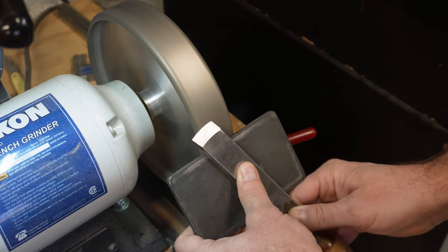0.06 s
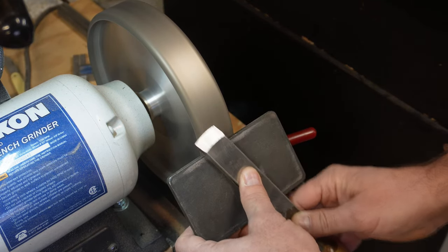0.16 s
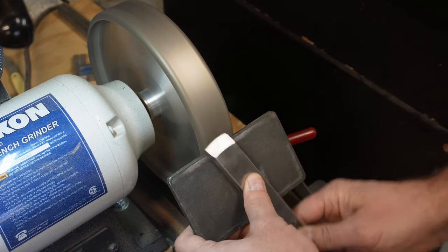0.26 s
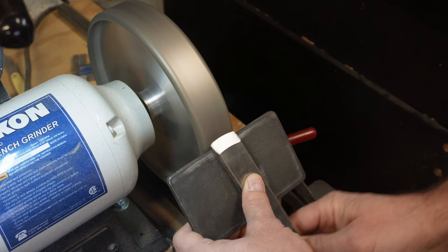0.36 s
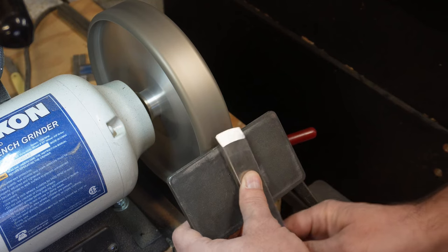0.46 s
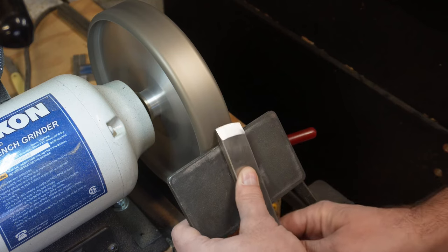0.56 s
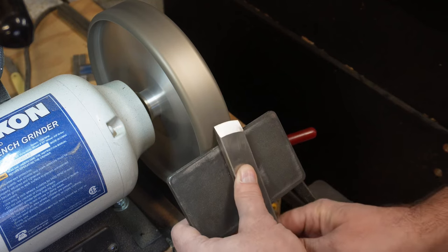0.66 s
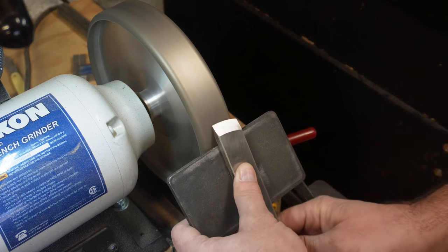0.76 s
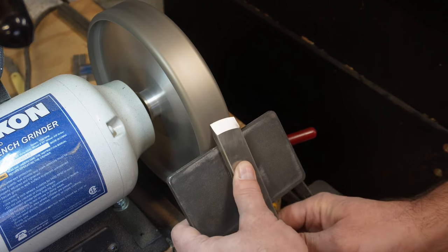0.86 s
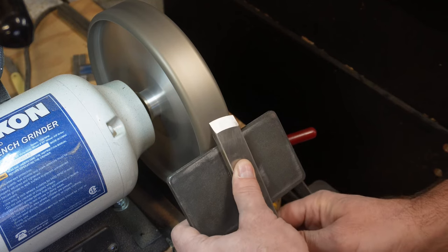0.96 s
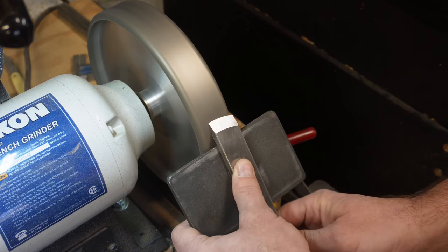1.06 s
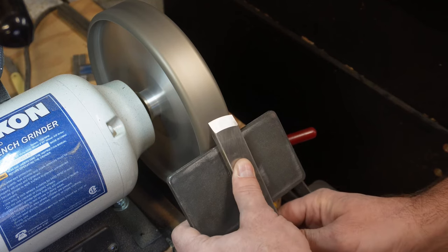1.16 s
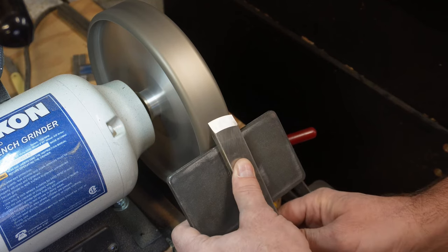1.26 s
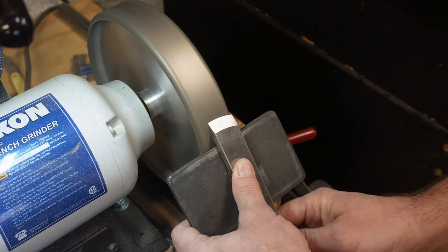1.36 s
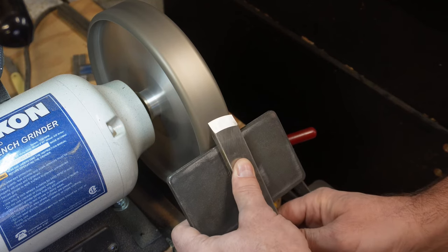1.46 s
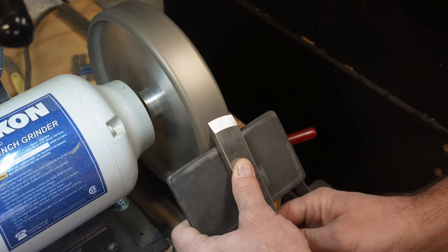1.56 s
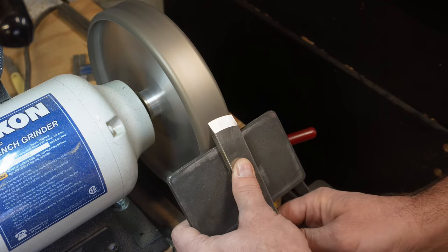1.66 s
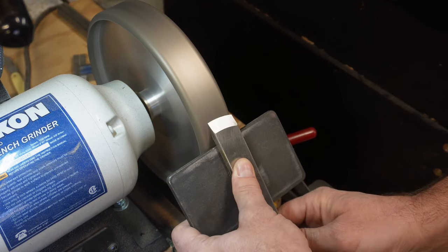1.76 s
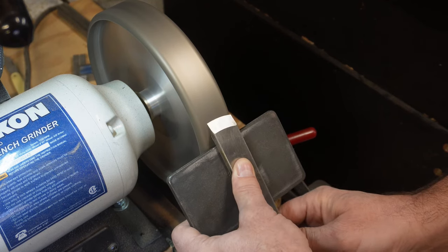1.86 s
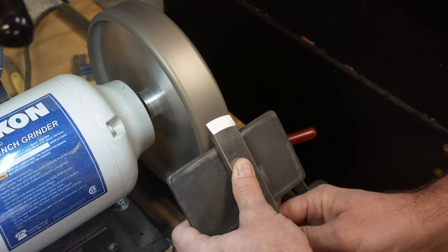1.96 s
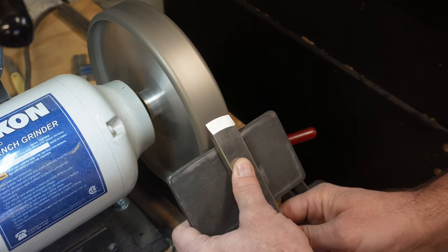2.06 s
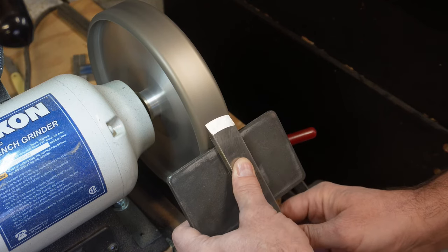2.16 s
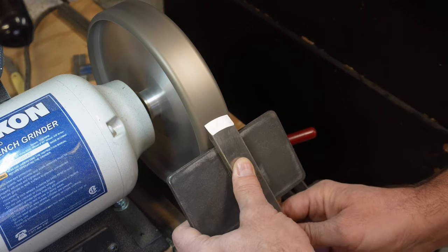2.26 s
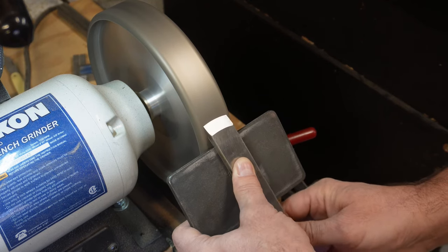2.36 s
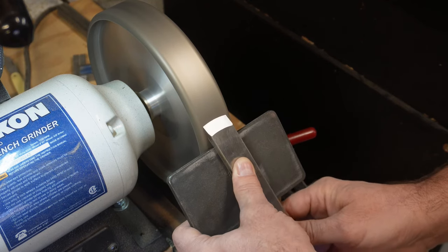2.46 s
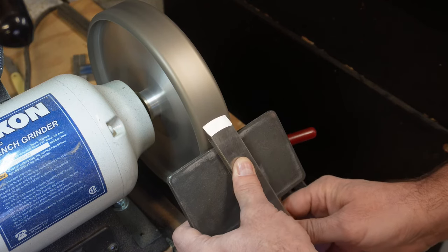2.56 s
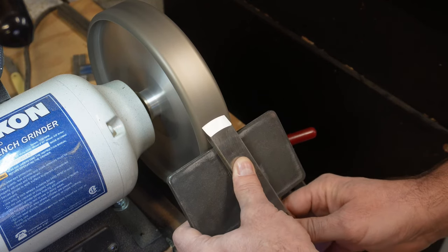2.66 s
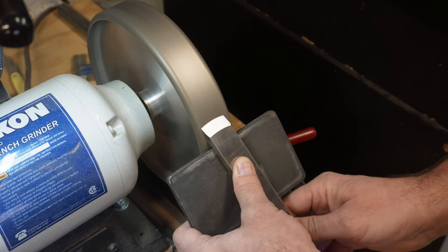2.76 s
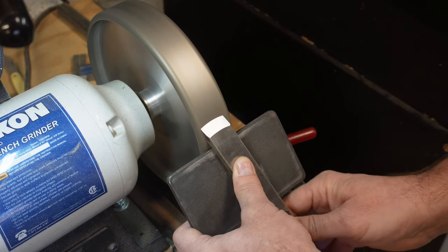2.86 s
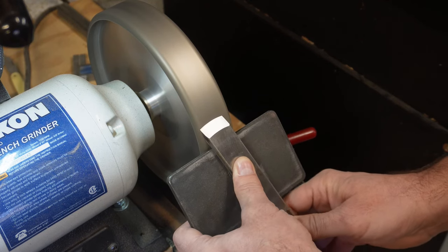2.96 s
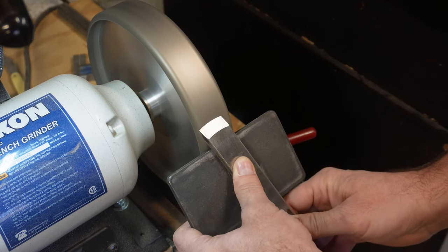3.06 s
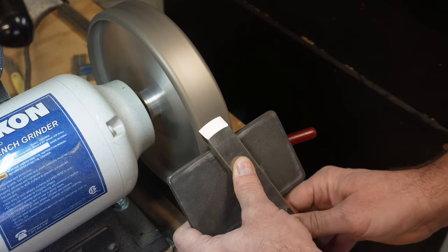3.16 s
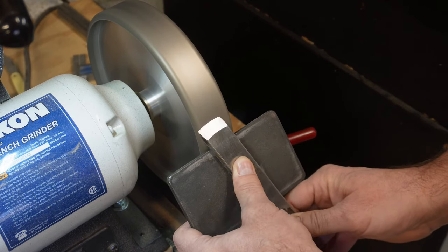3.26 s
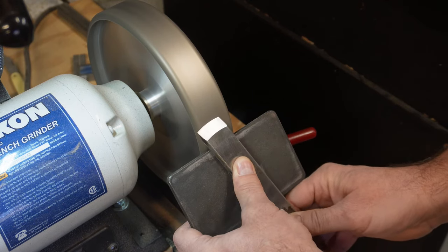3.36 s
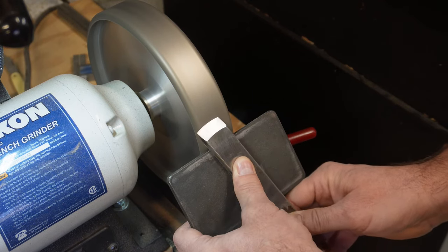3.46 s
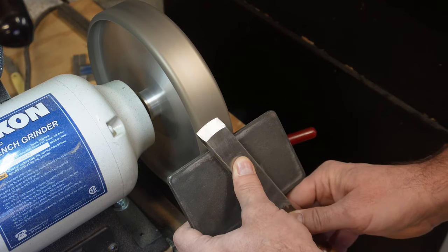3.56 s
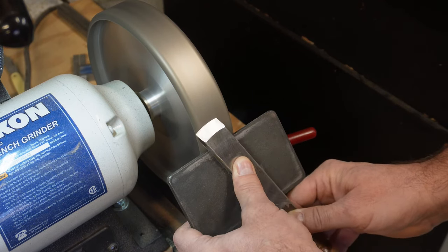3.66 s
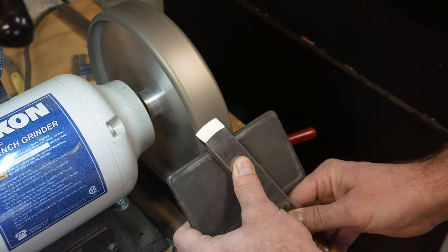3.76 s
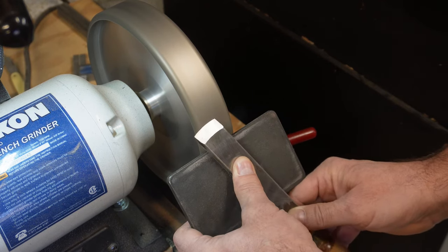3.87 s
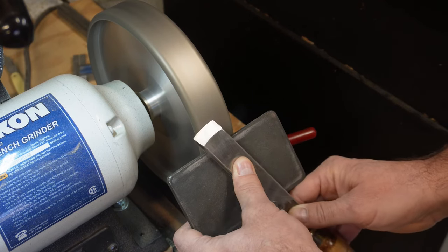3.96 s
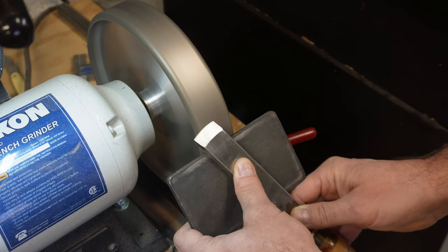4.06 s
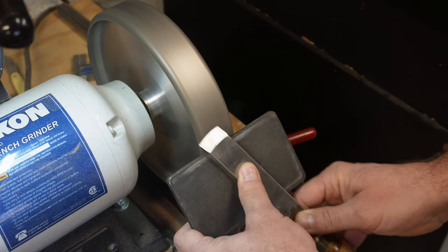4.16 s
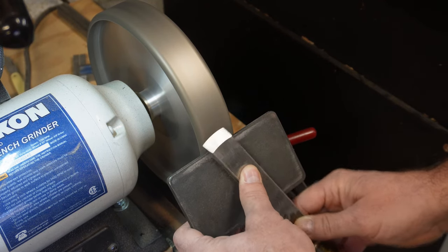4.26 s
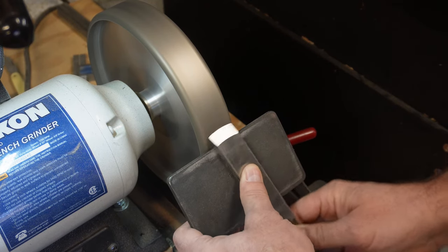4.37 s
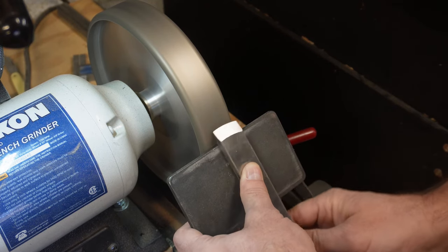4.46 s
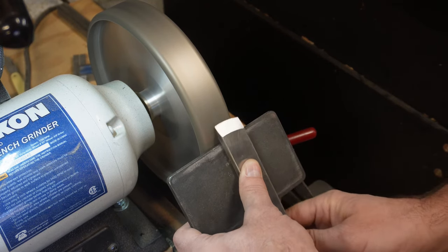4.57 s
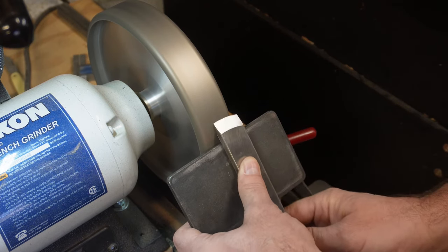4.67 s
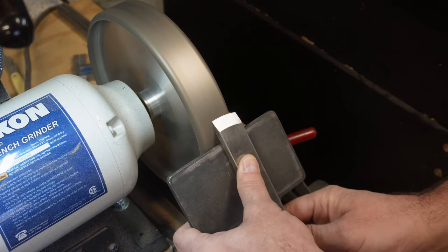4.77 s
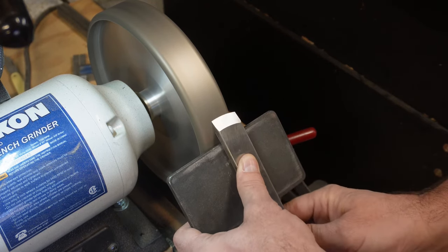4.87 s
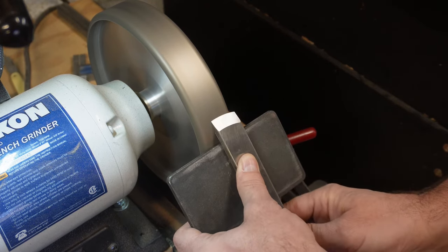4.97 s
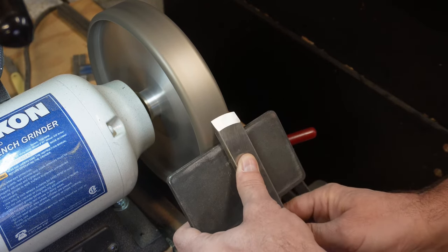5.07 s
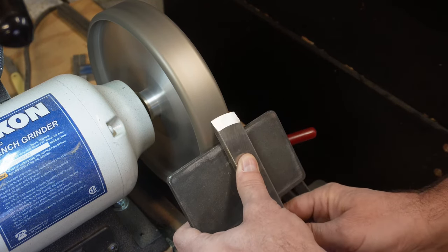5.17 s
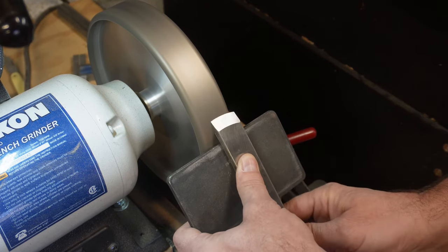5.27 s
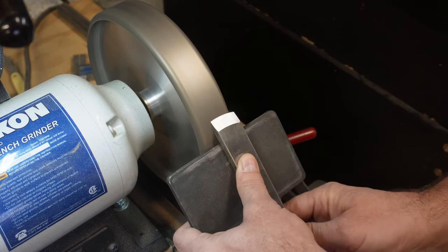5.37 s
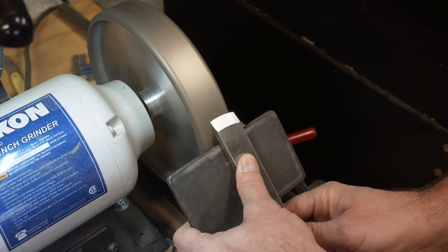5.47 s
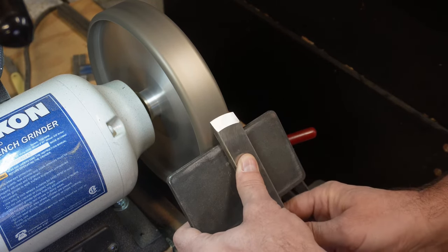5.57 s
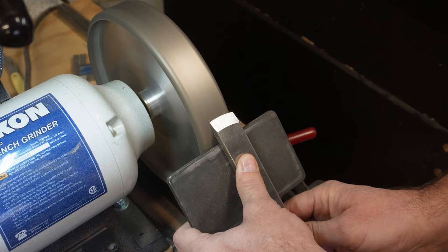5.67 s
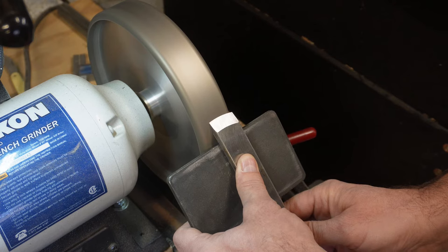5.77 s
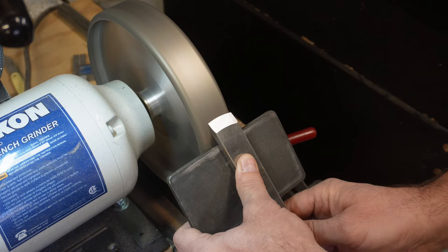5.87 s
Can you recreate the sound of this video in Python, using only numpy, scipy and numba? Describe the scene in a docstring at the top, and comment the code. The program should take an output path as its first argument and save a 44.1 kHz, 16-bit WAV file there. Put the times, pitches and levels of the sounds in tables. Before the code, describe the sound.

Steel tool against a spinning metal wheel, recorded close and fairly dry, nearly centred. A brief loud hissing rasp cuts off into a clear bell-like ring over motor hum, whirr and low rattle. A long gritty scrape follows, with thin squeals and a fast juddering buzz, growing coarser and brighter towards its end. A few scratchy skips, another ringing pause with faint scuffs, then a last, softer scrape.

```python
"""A gritty steel rasp breaks off and a wheel sings on like a bell; two longer passes follow over a motor's hum.
A steel scraper is swept across the rim of a metal wheel on a bench grinder, close by.
The rim's grit comes round once a turn, so the rasp nearly repeats; it rings scraper and wheel.
The tool rest shakes on shaft multiples. Motor hum, rattle, whirr and a low rumble lie underneath."""
import sys
import numpy as np
from scipy import signal
from scipy.fft import rfft, irfft, next_fast_len
from scipy.io import wavfile
from scipy.ndimage import uniform_filter1d, map_coordinates
from numba import njit

SR = 44100
rng = np.random.default_rng(int(sys.argv[2]) if len(sys.argv) > 2 else 0)


def level_to_linear(level):
    """Convert decibel levels to linear amplitude factors, elementwise."""
    exponent = np.asarray(level, float) / 20
    return 10 ** exponent


def unload_wav(signal):
    """Save mono or channel-first audio to the path in sys.argv[1] as 16-bit WAV at rate SR, clipped to [-1, 1]."""
    wavfile.write(
        sys.argv[1],
        SR,
        np.round(np.clip(np.atleast_2d(signal).T, -1, 1) * 32767).astype(np.int16),
    )


N = 261072

# All levels are ahead of the gain control; rel_db is scaled again where used.
# sweep: 0 scraper held square, 1 turned, 2 on its corner. multiple: of the shaft speed.

# hand on the scraper, one table a pass: (time_s, pressure_rel_db, sweep, rest_thud_db)
PASSES = [
    [(0, -15, 2.24, -65), (.11, -24.5, 1.054, -50)],
    [(1.03, -26, 0.99, -33.5), (1.3, -23, 0.037, -33), (1.7, -23, 0.083, -34), (2.2, -21.5, 0.33, -27),
     (2.7, -22.5, 1.03, -30.5), (3.5, -23, 1.91, -31.5), (3.92, -21.5, 1.88, -46), (4.0, -19.5, 1.44, -58),
     (4.02, -16, 1.3, -43)],
    [(4.84, -28.5, 1.387, -32.5), (5.1, -27, 1.05, -32), (5.88, -25, 1.14, -32.5), (5.92, -23, 0.94, -28)],
]
# steel on the rim: (start_s, end_s)
CONTACT = [(-1, .11), (1.0245, 4.012), (4.8335, 5.92)]
# broad rasp colour, square and corner: (freq_hz, density_rel_db)
GRIT_SQUARE = [(1200, -0.5), (1800, 5), (2300, -8), (3000, -42), (5000, -4), (8000, 5), (9400, -1.5),
               (10400, -11), (13000, -6), (15000, -13), (15750, -32)]
GRIT_CORNER = [(1200, -5), (1800, 4), (2300, -13), (3000, 8), (4200, -1.5), (5000, 3), (7500, -2.5),
               (10400, -16), (13000, -8), (15000, -18), (15750, -34)]
# scraper resonances: (freq_hz, width_hz, square_rel_db, turned_rel_db, corner_rel_db)
SCRAPER = [(2081, 19, 0, -5.5, -13), (2823, 76, -22, -10, -0.5), (2948, 70, -7.5, -15, -4),
           (3463, 130, -16.5, -9, -9), (3810, 103, -49, -4.5, -6), (4103, 75, -1, -62, -4),
           (4455, 17, -3.5, -20, -13), (5485, 103, -3.5, -0.5, -9), (6300, 25, 10, 2.5, -4),
           (6530, 57, -2, 1, -18), (6750, 110, -26, -22, -4), (7720, 150, -3, 0.5, -42),
           (8117, 40, 5, -7, -27), (8350, 25, 14, -8, -15), (9834, 35, 12.5, 4, 2.5),
           (11480, 65, 6, -12, -11), (12850, 100, -16, -29, -18), (13050, 120, -23, -35, -10),
           (14440, 47, -7, -25, -15), (15250, 46, -22, -7, -12)]
# scraper mode squealing on part of each turn: (centre_s, half_length_s, multiple, place_turns, level_db)
SQUEALS = [(1.5, .35, 97, .75, -41), (2.9, .32, 96, .68, -27), (3.65, .35, 97, .6, -30),
           (2.65, .5, 186, .7, -28.5), (2.85, .22, 126, .8, -33)]
# proud grain catching the steel once a turn: (centre_s, half_length_s, place_turns, level_rel_db)
PROUD = [(1.4, .2, .585, -11), (1.6, .25, .89, -10), (1.8, .08, .585, -9), (2.38, .1, .5, -4),
         (2.85, .12, .74, -10), (5.6, .22, .56, -4), (5.65, .25, .6, -9)]
# steel meeting or skipping on the rim: (start_s, level_rel_db, ring_hz, length_s, ring_share_0_1)
TOUCHES = [(0.1245, -13.5, 2850, 0.016, 0.34), (1.0235, -13, 6300, 0.027, 1),
           (1.057, -22, 6500, 0.025, 0.6), (3.922, -20, 2850, 0.015, 0.9), (3.957, -11, 3400, 0.018, 0.54),
           (3.991, -28, 3400, 0.013, 0.9), (4.027, -12.5, 5160, 0.027, 0.3),
           (4.066, -15.5, 4740, 0.012, 0.23), (4.835, -10, 3370, 0.011, 0.4),
           (4.854, -11, 3350, 0.031, 0.62), (4.893, -15.5, 3267, 0.018, 1)]
# upper wheel modes: (freq_hz, level_rel_db, free_t60_s)
WHEEL = [(2780, -33, 3.9), (4452, 0.5, 0.37), (7760, -22, 1.1), (7947, -1, 1.02), (11237, 3, .4),
         (11410, 0, .4), (14465, 7, 0.7), (14500, 1, 0.98)]
# lowest wheel mode, split in two by the spin: (free_hz, driving_multiple)
BELL = [(1629, 55), (1744.5, 59)]
# free decay of the two halves: (lower_s, upper_s)
BELL_T60_S = [2.64, 1.84]
# grit driving the two halves, one table a pass: (time_s, lower_db, upper_db)
SINGING = [
    [(0.0, -29, -25), (0.056, -25, -22), (0.11, -28.5, -23.5)],
    [(1.04, -30, -34), (1.35, -28.5, -24), (1.64, -26.5, -33), (1.77, -25, -23.5), (2.01, -33, -18.5),
     (2.32, -21, -19.5), (2.4, -21, -26), (2.59, -21.5, -20.5), (3.38, -29, -30), (3.46, -29.5, -42),
     (3.74, -35, -40), (3.81, -27.5, -31), (3.92, -31.5, -42), (4.01, -35, -31.5)],
    [(4.85, -51, -61), (4.872, -43, -49), (5.002, -37.5, -40.5), (5.314, -33, -23.5), (5.496, -40, -24),
     (5.604, -38, -29), (5.92, -26, -25)],
]
# shaking of the tool rest, low thud and higher buzz: (multiple, level_rel_db)
THUD = [(14, -12.5), (15, 4), (16, 0.5), (17, 4), (18, -4), (19, -2.5)]
BUZZ = [(20, -16), (22, -8), (25, -7), (26, -8.5), (30, -7), (31, -3), (32, -7), (36, -3), (37, -6.5),
        (38, -6.5), (39, -18), (43, -12), (44, -5.5), (46, -11), (47, -3.5)]
# smear of the thud round the turn: (sweep, phase_rad per squared step of multiple)
SMEAR = [(.15, -1.5), (.25, -.1), (.65, -.3), (1.05, -1.4), (1.6, -.4)]
# scraper sliding on the rest between passes: (centre_s, half_length_s, level_db)
SLIDES = [(0.27, 0.063, -51.5), (4.202, 0.044, -51), (4.435, .04, -54.5)]
# small dry ticks between passes: (start_s, level_rel_db)
TICKS = [(.648, -40), (4.692, -50)]
# idle rattle of the motor, and lower rattle of the bench under it: (multiple, level_rel_db)
IDLE = [(13, -26.5), (15, -27), (17, -30), (18, -19), (19, -21)]
IDLE_LOW = [(3, -18), (5, -23), (6, -22), (7, -22.5), (8, -18.5), (9, -13), (10, -17)]
# air and bearing noise of the motor: (freq_hz, density_rel_db)
WHIRR = [(55, -55), (85, -30), (170, -18), (300, -11.5), (550, -13), (900, -12.5), (1150, -16),
         (1700, -23.5), (2100, -30.5), (4000, -31), (9900, -32), (13000, -37), (15700, -51)]
# low rumble swelling as the hands shift: (centre_s, half_length_s, level_db)
SWELLS = [(0.658, 0.22, -50), (1.298, .12, -51), (4.106, 0.3, -49)]

# turns per s running free; turns per s lost square, turned, on the corner; time to follow
FREE_TURNS_HZ, LOAD_TURNS_HZ, SPEED_LAG_S = 29.88, [.26, .265, .19], .1
# extra bite of a landing, and its fade
BITE_DB, SETTLE_S = 5.5, 0.075
# run-out throb (0-1) square, turned, on the corner; high spot of the rim
THROB_DEPTH, HIGH_SPOT_TURNS = [0.23, 0.47, 0.045], 0.71
# rest resonance square, turned, on the corner; drop while unsettled
REST_HZ, UNSETTLED_HZ = [525, 489, 494], 51
BUZZ_DB, BUZZ_DB_PER_PRESSURE_DB, BUZZ_DB_PER_SWEEP, BUZZ_LACK_DB = -33, 0.11, 0.78, 11
KNOCK_SPOT_TURNS = 1.0
HUM_HZ, HUM_DB, RUMBLE_DB = 120, -32, -56
# gain control: aim, dB taken per dB above it, time to follow
AIM_DB, SQUEEZE, FOLLOW_S = -17.5, 0.17, 0.093
TOP_HZ = 15780


def grinding():
    """The rasp: grit hisses, and rings the scraper's resonances as it is held."""
    pressure_db, sweep, _ = curves(np.concatenate(PASSES))
    pressure = contact() * level_to_linear(pressure_db + BITE_DB * unsettled())
    held = np.clip(sweep, 0, 2)
    depth = np.interp(sweep, range(3), THROB_DEPTH)
    hiss = grit(depth, HIGH_SPOT_TURNS, memory=0.94, sharpness=0.54)
    push = grit(depth, HIGH_SPOT_TURNS, memory=0.901, sharpness=2.2)
    share = held * np.pi / 4
    rasp = 0
    for colour, weight in ((GRIT_SQUARE, np.cos(share)), (GRIT_CORNER, np.sin(share))):
        broad = unit(filtered(hiss, lambda f: level_to_linear(along(colour, f))))
        rasp = rasp + level_to_linear(-6.5) * weight * pressure * broad
    for hold in range(3):
        weight = np.sqrt(np.clip(1 - abs(held - hold), 0, 1))

        def body(f):
            """Scraper resonances of this hold, alternating in sign."""
            return sum((-1) ** k * level_to_linear(levels[hold]) * resonance(f, hz, width)
                       for k, (hz, width, *levels) in enumerate(SCRAPER))

        gain = level_to_linear(-5.5) / np.std(filtered(push, body))
        rasp = rasp + gain * filtered(weight * pressure * push, body)
    return rasp


def grit(depth, spot, memory, sharpness):
    """Force of the grit on the steel, throbbing with the wheel's run-out."""
    # coarse grit follows the run-out by the power sharpness; fine grit is sooner new
    coarse = filtered(track(memory), lambda f: 1 / (1 + (f / 6000) ** 2))
    fine = filtered(track(0.833), lambda f: 1 - 1 / (1 + (f / 6000) ** 2))
    fine = fine + 0.37 * rng.standard_normal(N)
    lumps = level_to_linear(3.0 * track(0.846, size=40))
    throb = 1 + depth * np.cos(2 * np.pi * (turns() - spot))
    return unit((coarse * throb ** sharpness + fine * throb) * lumps)


def track(memory, size=1488):
    """Grit under the steel, size points a turn: each turn keeps a share of the last turn's pattern."""
    keep = np.clip(memory, 0, .99)
    angle = turns()
    rows = rng.standard_normal((int(angle[-1]) + 40, size))
    rim = signal.lfilter([np.sqrt(1 - keep ** 2)], [1, -keep], rows, axis=0)[30:]
    return unit(map_coordinates(rim.ravel(), [angle * size]))


def squeals():
    """Scraper tones locked to the shaft, opened once a turn and roughened by the grit."""
    angle = turns()
    out = 0
    for s, half, k, place, db in SQUEALS:
        gate = np.clip(.45 + np.cos(2 * np.pi * (angle - place)), 0, 1)
        rough = level_to_linear(1.6 * track(0.77, size=16) + 0.83 * wobble(16))
        tone = np.sqrt(2) * np.sin(2 * np.pi * k * angle + 0.56 * track(.95, size=6))
        out = out + level_to_linear(db) * bump(s, half) * gate * rough * tone
    return contact() * out


def proud_grains():
    """A sharp tick each time a proud grain passes the edge."""
    angle = turns()
    impulses = 0
    for s, half, place, db in PROUD:
        passing = np.diff(np.floor(angle - place), prepend=np.floor(-place))
        impulses = impulses + level_to_linear(db) * bump(s, half) * passing
    return filtered(impulses * level_to_linear(1.5 * wobble(30)), lambda f: 2 * resonance(f, 6000, 3500))


def touches():
    """Steel brushing the high spot: a short gritty swell of noise with its own ring."""
    out = np.zeros(N)
    for s, db, hz, length_s, ring in TOUCHES:
        u = np.arange(SR // 20) / SR / length_s
        swell = (1 - np.exp(-u / 0.011)) * np.exp(-2.2 * u ** 2)
        burst = np.zeros(N)
        burst[round(s * SR):][:len(u)] = rng.standard_normal(len(u)) * swell
        out += level_to_linear(db - 4) * filtered(
            burst, lambda f: (1 - ring) * resonance(f, 5800, 5200) + 7 * ring * resonance(f, hz, 140))
    return out


def wheel(force):
    """Upper wheel modes: the steel halves their decay time while it touches, then they ring free."""
    damping = 1 - .5 * contact()
    out = 0
    for hz, db, t60_s in WHEEL:
        keep = level_to_linear(-60 / (SR * t60_s * damping))
        out = out + level_to_linear(db) * damped_mode(force, np.exp(2j * np.pi * hz / SR), keep)
    return level_to_linear(-43.0) * out


@njit
def damped_mode(force, turn, keep):
    """One mode as a rotating complex state whose decay changes from sample to sample."""
    out, state = np.zeros(len(force)), 0j
    for i in range(len(force)):
        state = state * keep[i] * turn + force[i]
        out[i] = state.imag
    return out


def singing():
    """The split bell mode locks to shaft multiples under the steel, and rings free between passes."""
    locked = uniform_filter1d(contact(), SR // 10)
    now = np.arange(N)
    last_touch = np.maximum.accumulate(now * contact()).astype(int)
    free_s = (now - last_touch) / SR
    out = 0
    for (free_hz, k), t60_s, driven_db in zip(BELL, BELL_T60_S, curves(np.concatenate(SINGING))):
        db = lagged(driven_db[last_touch] - 60 * free_s / t60_s, 0.0029)
        locked_hz = k * speed() + 1.243 * wobble(6.6)
        pitch_hz = locked * locked_hz + (1 - locked) * free_hz
        waver_db = locked * (1.27 * wobble(20) + 1.37 * track(0.99, size=4))
        tone = np.sqrt(2) * np.sin(2 * np.pi * np.cumsum(pitch_hz) / SR)
        out = out + level_to_linear(db + waver_db) * tone
    return out


def tool_rest():
    """Rest and bench shake on shaft multiples, over rougher repeating noise, and settle slowly."""
    pressure_db, sweep, thud_db = curves(np.concatenate(PASSES))
    buzz_db = BUZZ_DB + BUZZ_DB_PER_PRESSURE_DB * (pressure_db - np.median(pressure_db))
    buzz_db = buzz_db + BUZZ_DB_PER_SWEEP * sweep - BUZZ_LACK_DB * unsettled()
    centre_hz = np.interp(sweep, range(3), REST_HZ) - UNSETTLED_HZ * unsettled()
    pressed = lagged(contact(), .04)
    rough = unit(filtered(track(0.85), lambda f: resonance(f, 570, 340) + resonance(f, 1060, 490)))
    # multiples nearest the rest's resonance stand out
    near = [(k, db - 10 * np.log10(1 + ((k * speed() - centre_hz) / 45) ** 2)) for k, db in THUD]
    smear = np.interp(sweep, *np.transpose(SMEAR))
    thud = level_to_linear(thud_db) * orders(near, waver_db=2.0, rate=2.41, spot=.5, scatter=0.35, smear=smear)
    knock = orders([(8, -4.0), (9, 4.0), (10, -1), (11, -6.5)],
                   waver_db=4.7, rate=2.4, spot=KNOCK_SPOT_TURNS, scatter=0.44)
    bench = level_to_linear(thud_db - 14.5) * knock
    buzzing = orders(BUZZ, waver_db=2.5, rate=2.554, spot=.6, scatter=2.58)
    buzz = level_to_linear(buzz_db) * unit(buzzing + 0.75 * rough)
    return filtered(pressed * (thud + bench + buzz), lambda f: 1 / (1 + (150 / (f + 1)) ** 4))


def slides():
    """Scraper sliding on the rest: a faint scuff that rings its low modes."""
    stroke = sum(level_to_linear(db) * bump(s, half) for s, half, db in SLIDES)
    scuff = level_to_linear(3.6 * wobble(60)) * rng.standard_normal(N)
    return stroke * unit(filtered(scuff, lambda f: resonance(f, 3030, 300) + .5 * resonance(f, 3700, 900)))


def ticks():
    """Faint broad clicks: noise dying in a few milliseconds."""
    t = np.arange(N) / SR
    puff = sum(level_to_linear(db) * (t >= s) * np.exp(-abs(t - s) / .003) for s, db in TICKS)
    return filtered(puff * rng.standard_normal(N), lambda f: resonance(f, 3500, 7000))


def motor():
    """Mains hum, shaft rattle, whirr, and a chug and a tick each turn; the bench rumbles below."""
    hum = np.sqrt(2) * np.sin(2 * np.pi * HUM_HZ * np.arange(N) / SR)
    rattle = orders(IDLE, waver_db=2.0, rate=2.89, spot=.6, scatter=0.42)
    knock = orders(IDLE_LOW, waver_db=2.2, rate=2.82, spot=KNOCK_SPOT_TURNS, scatter=0.59)
    # bearing noise partly repeats with the shaft
    bearing = 0.2 * track(0.54) + rng.standard_normal(N)
    bearing = bearing * level_to_linear(0.7 * wobble(30) + 1.5 * track(0.8, size=12))
    whirr = unit(filtered(bearing, lambda f: level_to_linear(along(WHIRR, f))))
    tick_gate = level_to_linear(19 * np.cos(2 * np.pi * turns()) + 2.8 * wobble(19))
    tick = unit(filtered(tick_gate * rng.standard_normal(N), lambda f: resonance(f, 6640, 300)))
    chug_gate = level_to_linear(9.4 * np.cos(2 * np.pi * (turns() - .6)))
    chug = unit(filtered(chug_gate * track(.99),
                         lambda f: resonance(f, 490, 160) + 0.97 * resonance(f, 820, 420)))
    rumble = unit(filtered(rng.standard_normal(N), lambda f: resonance(f, 37, 47) ** 2))
    swell = level_to_linear(RUMBLE_DB) + sum(level_to_linear(db) * bump(s, half) for s, half, db in SWELLS)
    # levels relative to the hum
    running = hum + level_to_linear(-12) * rattle + level_to_linear(-9.0) * knock + level_to_linear(-13.0) * whirr
    running = running + level_to_linear(-33.0) * tick + level_to_linear(-17.5) * chug
    return level_to_linear(HUM_DB) * running + swell * rumble


def short_tail(x):
    """A short noise tail after the sound, longest in the lows and shortest near 3 kHz."""
    hz, t, z = signal.stft(rng.standard_normal(SR // 2), SR, nperseg=256)
    t60_s = along([(300, 0.76), (3000, 0.18), (12000, 0.3)], hz)[:, None]
    tail = signal.istft(z * level_to_linear(-60 * t / t60_s), SR, nperseg=256)[1]
    return signal.fftconvolve(np.pad(x, (300, 0)), tail / np.linalg.norm(tail))[:N]


def contact():
    """1 while the steel is on the rim, else 0."""
    t = np.arange(N) / SR
    return sum(1. * (t >= start) * (t <= end) for start, end in CONTACT)


def unsettled():
    """1 as the steel lands, fading as it settles."""
    t = np.arange(N) / SR
    return sum((t >= start) * np.exp(-abs(t - start) / SETTLE_S) for start, _ in CONTACT)


def speed():
    """Turns a second: the steel slows the shaft."""
    sweep = curves(np.concatenate(PASSES))[1]
    load_hz = contact() * np.interp(sweep, range(3), LOAD_TURNS_HZ)
    return FREE_TURNS_HZ - lagged(load_hz, SPEED_LAG_S)


def turns():
    """Shaft angle in turns."""
    return np.cumsum(speed()) / SR


def orders(table, waver_db, rate, spot, scatter, smear=0):
    """Wavering sines on shaft multiples; little phase scatter makes them beat once a turn, at the spot."""
    angle = 2 * np.pi * (turns() - spot)
    middle = table[len(table) // 2][0]
    out = 0
    for k, db in table:
        level = level_to_linear(db + waver_db * wobble(rate))
        phase = smear * (k - middle) ** 2 + scatter * rng.normal() + 0.51 * wobble(rate)
        out = out + level * np.cos(k * angle + phase)
    return unit(out)


def unit(x):
    """Scaled to rms 1."""
    return x / np.sqrt(np.mean(x ** 2) + 1e-20)


def along(points, hz):
    """(freq_hz, value) points read on a log frequency axis."""
    f, v = np.transpose(points)
    return np.interp(np.log(hz + 1), np.log(f + 1), v)


def curves(rows):
    """One value per sample for each column after the time."""
    s, *cols = np.transpose(rows)
    return [np.interp(np.arange(N) / SR, s, c) for c in cols]


def bump(centre_s, half_s):
    """Gaussian swell of peak 1, down to 1/e at half_s from the centre."""
    return np.exp(-((np.arange(N) / SR - centre_s) / half_s) ** 2)


def wobble(rate):
    """A smooth random curve, rate knots a second."""
    coarse = np.arange(0, N + 64, 64)
    knots = rng.standard_normal(int(N * rate / SR) + 4)
    return np.interp(np.arange(N), coarse, map_coordinates(knots, [coarse * rate / SR]))


def lagged(x, seconds):
    """x followed with a delay, starting from its first value."""
    keep = np.exp(-1 / (SR * seconds))
    return signal.lfilter([1 - keep], [1, -keep], x - x[0]) + x[0]


def filtered(x, response):
    """x times a complex response of frequency."""
    m = next_fast_len(N + SR)
    return irfft(rfft(x, m) * response(np.fft.rfftfreq(m, 1 / SR)), m)[..., :N]


def resonance(f, hz, width):
    """Causal resonance of peak gain 1."""
    return 1j * f * width / (hz * hz - f * f + 1j * f * width)


def scene():
    """Rasp in the middle, a faint treble tail in opposite sign left and right, motor slightly right."""
    rasp = grinding() + squeals() + touches() + proud_grains()
    rasp = filtered(rasp, lambda f: 1 / (1 + (130 / (f + 1)) ** 4))
    steel = rasp + wheel(rasp) + level_to_linear(-10.0) * short_tail(rasp)
    steel = steel + singing() + tool_rest() + slides() + ticks()
    treble_tail = level_to_linear(-30.5) * short_tail(filtered(rasp, lambda f: f > 2400))
    return steel + treble_tail * [[1], [-1]] + motor() * level_to_linear(np.array([[-.2], [.2]]))


def low_pass(x):
    """Removes everything above the highest recorded frequency."""
    return signal.sosfilt(signal.butter(12, 16050, fs=SR, output="sos"), x)


def record(dry):
    """Gain control rides the level; faint noise in opposite sign left and right; then the band limit."""
    power = lagged(uniform_filter1d(np.mean(dry ** 2, axis=0), SR // 20), FOLLOW_S)
    level_db = 10 * np.log10(abs(power) + 1e-9)
    ridden = dry * level_to_linear(-SQUEEZE * (level_db - AIM_DB))
    noise = unit(filtered(rng.standard_normal(N), lambda f: 0.039 + 1 / (1 + (f / 400) ** 2)))
    apart = level_to_linear(-59.5) * noise
    mix = filtered(ridden + [apart, -apart], lambda f: f < TOP_HZ)
    return low_pass(mix)


dry = scene()
out = record(dry)
unload_wav(out)
```